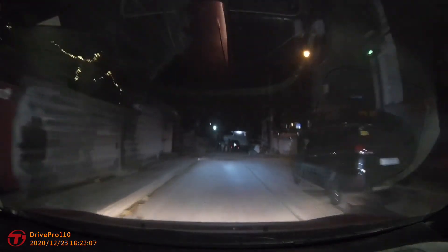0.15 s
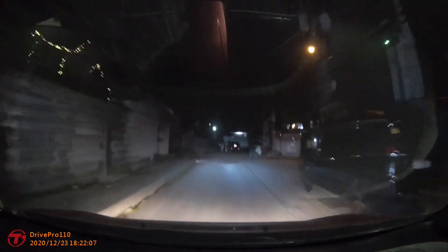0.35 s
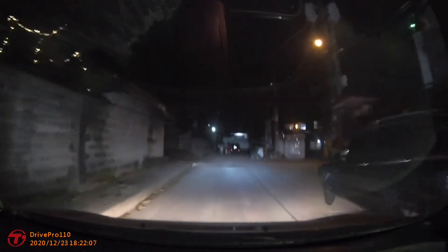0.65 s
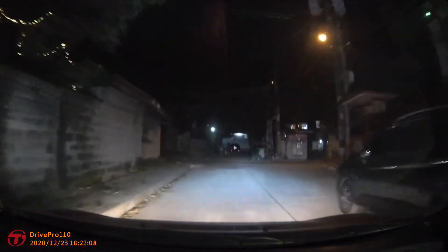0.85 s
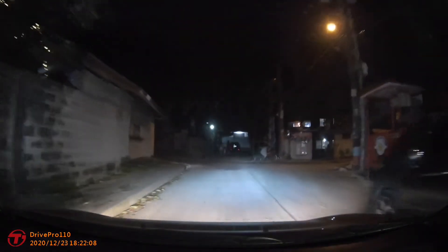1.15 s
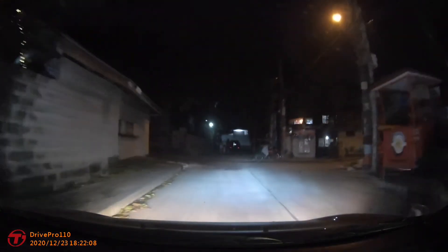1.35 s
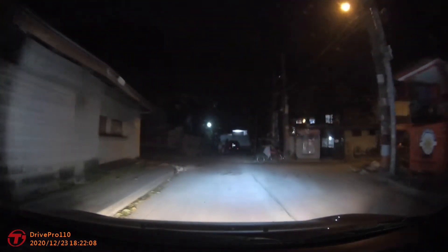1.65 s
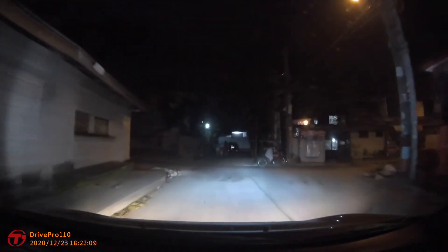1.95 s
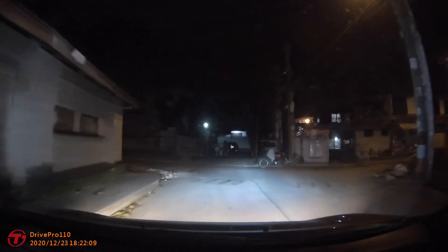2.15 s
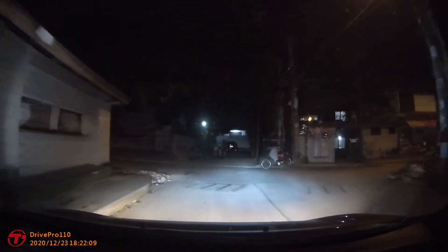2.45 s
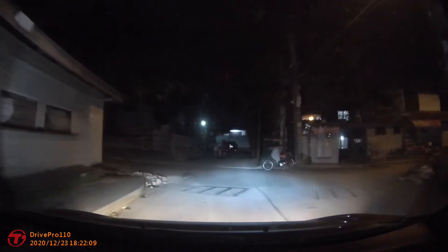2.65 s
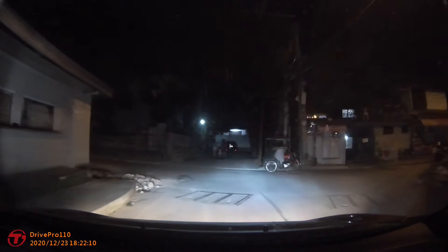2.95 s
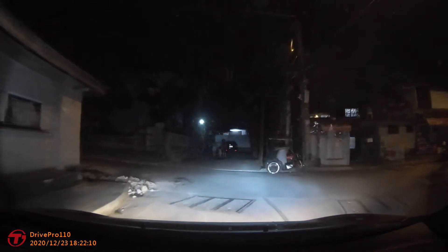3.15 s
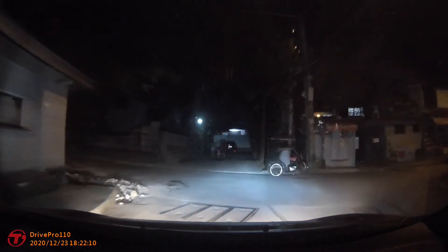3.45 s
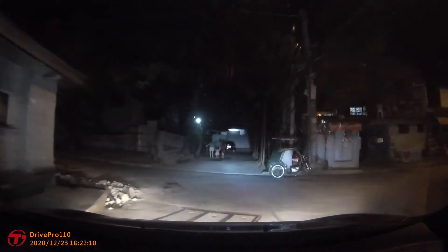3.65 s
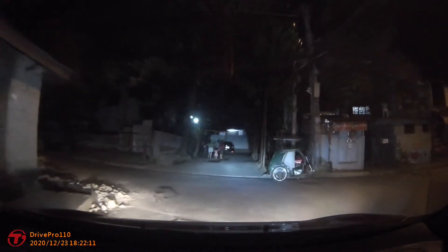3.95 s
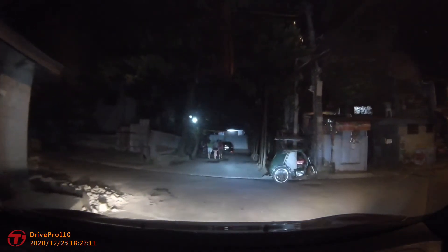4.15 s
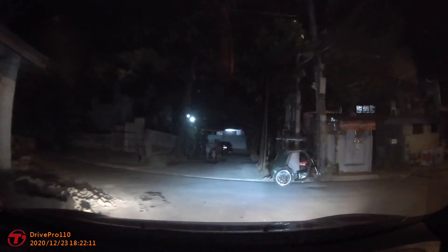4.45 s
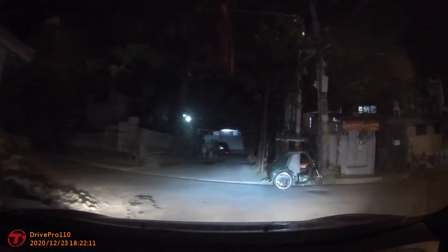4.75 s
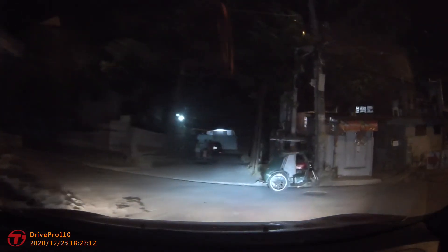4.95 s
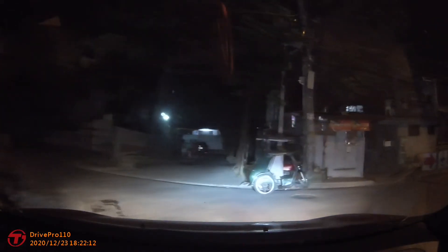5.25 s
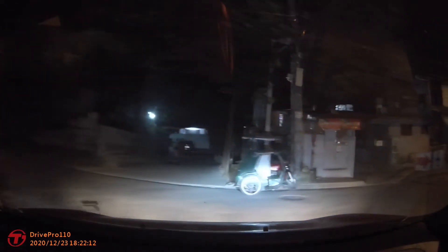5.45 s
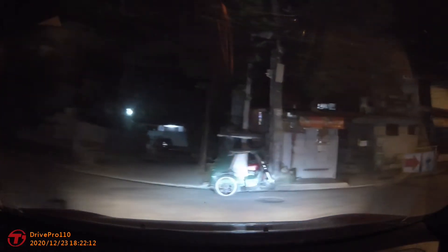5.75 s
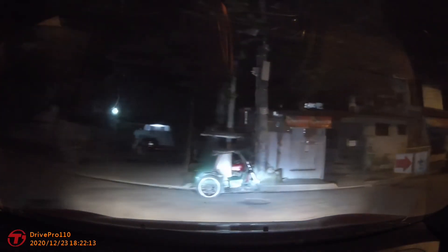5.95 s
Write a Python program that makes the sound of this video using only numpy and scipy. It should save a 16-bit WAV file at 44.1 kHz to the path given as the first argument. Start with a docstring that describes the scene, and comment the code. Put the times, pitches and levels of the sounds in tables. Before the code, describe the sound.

Inside a car rolling slowly over a rough lane, very low booms and shuddering rumble dominate the first three seconds. A loose fitting raps hard around two seconds, then the road calms. More knocks come around five seconds, followed by a low engine tone and a bright plastic crack at the end. A faint indicator ticks steadily throughout, close to the cabin microphone, under thin electronic hiss.

```python
"""Low booms of a car's body shell come first, over tyre roar, as it rolls slowly down a rough lane at night.
The microphone sits in the cabin behind the windscreen: close by, an indicator ticks, plastic snaps and a
loose fitting knocks; tyre noise comes up through the floor, and an engine tone rises at the end.
Booms and tones are wandering sines, road noise is shaped noise, and knocks are pushes ringing decaying modes.
The recorder's own electronics hiss and whine, and its input flattens the loudest booms."""
import sys
import numpy as np
from scipy import signal
from scipy.fft import rfft, irfft
from scipy.io import wavfile
from scipy.ndimage import uniform_filter1d

SR = 44100
rng = np.random.default_rng(int(sys.argv[2]) if len(sys.argv) > 2 else 0)


def to_wav(s):
    """Save 16-bit WAV."""
    ch = np.atleast_2d(s).T  # columns
    pcm = np.round(np.clip(ch, -1, 1) * 32767)  # PCM
    wavfile.write(sys.argv[1], SR, pcm.astype(np.int16))


N = 269010
T = np.arange(N) / SR  # seconds

# Recorder hiss spectrum: pitch_hz, relative_level_db (per Hz)
CIRCUIT_SPECTRUM = [(6000, -4), (7000, -6.5), (8500, -3), (11000, -3), (14000, -6), (14900, -16)]
# Recorder whistles: pitch_hz, level_db (rms, at mean hiss level)
WHINE_TONES = [(3628, -66.5), (5443, -83.5), (7203, -90), (7257, -88), (7364, -83), (9071, -81),
               (9125, -83.5), (9916, -72), (10939, -86), (12753, -89)]
# Mean hiss level in dB, and its change in dB per dB of trim buzz
HISS_DB, HISS_FOLLOWS = -66, 0.6
# Input stage: full-scale ceiling of the soft limit, and upper band edge in Hz
CLIP, TOP_HZ = 0.99, 14950

# Indicator ticks: start_s, peak_db
TICKS = [(0.169, -49), (0.5287, -45), (0.8884, -42), (1.2476, -44.5), (1.6077, -44), (1.9674, -46),
         (2.328, -42), (2.6878, -44), (3.047, -46), (3.4072, -44.5), (3.7673, -45.5), (4.128, -43.5),
         (4.4862, -45.5), (4.8469, -50), (5.2059, -44), (5.5662, -45), (5.9259, -42)]
# Tick pitch, burst length, tail level against the tick, tail decay by 60 dB
TICK_HZ, TICK_BURST_S, TICK_TAIL_DB, TICK_T60_S = 1973, 0.0046, -10, 0.068
# Engine order: mean pitch, mean rms level, onset, linear rise time
ENGINE_HZ, ENGINE_DB, ENGINE_ON_S, ENGINE_RISE_S = 178.5, -37.5, 5.84, 0.041

# Steady road noise: time_s, panel_drumming_db, low_tyre_roar_db, high_tyre_roar_db, trim_buzz_db
ROAD_LEVELS = [(0.0, -24, -32.5, -36, -51.5), (0.12, -33.5, -36.5, -45.5, -59.5),
               (0.59, -30, -40, -38.5, -58), (0.93, -30, -38.5, -40.5, -55.5), (1.34, -32.5, -39, -42, -57),
               (1.54, -33, -38.5, -40.5, -55), (2.11, -32.5, -37, -42.5, -58),
               (2.31, -34.5, -41.5, -42.5, -55.5), (2.48, -35, -45, -45, -58.5),
               (2.78, -33.5, -42, -42, -55), (3.36, -37.5, -44, -43, -57.5),
               (3.6, -38.5, -47, -48.5, -59.5), (4.08, -37, -43, -45, -57.5),
               (4.62, -42, -52, -50.5, -62.5), (4.86, -43.5, -47, -51, -64.5),
               (5.11, -42.5, -46.5, -47, -61), (5.4, -41.5, -48, -46.5, -60.5),
               (5.69, -41, -50, -43, -58.5), (6.1, -41, -52, -45, -55.5)]
# Jolts from the lane: peak_s, suspension_shudder_db, floor_db, door_panels_db, swell_and_fall_t60_s
LANE_JOLTS = [(0.064, -21, -20.5, -22, 0.42), (0.126, -9.5, -38.8, -50.0, 0.089),
              (0.335, -17, -23.5, -23.5, 0.21), (0.449, -23, -29, -24, 0.18), (0.538, -17, -47, -47, 0.21),
              (0.734, -23, -37, -30, 0.68), (0.843, -23, -50.0, -50.0, 0.2),
              (1.006, -13.5, -38, -50.0, 0.22), (1.09, -27, -23, -22, 0.34), (1.386, -19.5, -22, -31, 0.3),
              (1.551, -13.5, -48, -24, 0.12), (1.645, -21, -26.5, -30, 0.97),
              (1.767, -18, -50.0, -32, 0.19), (1.886, -24, -33, -33, 0.41), (2.018, -20, -26.5, -34, 0.75),
              (2.332, -22.5, -16.5, -25, 0.15), (2.366, -11.5, -22, -47, 0.091),
              (2.621, -27, -48, -35, 0.22), (2.843, -46, -29, -50.0, 0.092),
              (2.92, -21, -50.0, -34.5, 0.53), (3.34, -23.5, -27.5, -30, 0.7), (4.13, -16, -52, -52, 0.097),
              (4.964, -50.0, -27, -35, 0.095), (5.154, -25, -42, -54, 0.32), (5.303, -20, -41, -35, 0.15),
              (5.411, -34, -26.5, -35, 0.21)]
# Steady part of each body layer, dB above the panel drumming
SWAY_DB, SHUDDER_DB, DOORS_DB = 6.5, 6.5, -0.5
# Spectra of suspension, floor, door panels, low tyre roar through the seats, high tyre roar, loose trim,
# and a narrow drone in the tyre roar: pitch_hz, relative_level_db (per Hz)
SHUDDER_SPECTRUM = [(38, -51), (46, -20), (50, 0.5), (60, -1), (68, -4), (78, -8.5), (92, -20), (105, -52)]
FLOOR_SPECTRUM = [(72, -31), (85, -11.5), (95, 1.5), (104, -3), (122, -1.5), (138, -3), (155, -36)]
DOORS_SPECTRUM = [(125, -30), (143, -8.5), (160, 1), (174, -9.5), (205, -8), (245, -14.5), (275, -17.5),
                  (320, -36.5)]
SEATS_SPECTRUM = [(220, -39), (265, -9), (300, -1), (350, -1.5), (400, -2), (450, -9), (520, -28)]
TYRES_SPECTRUM = [(400, -21), (470, -5.5), (560, -4), (650, -4.5), (684, -3), (720, -8.5), (780, -5.5),
                  (960, -6), (1200, -9), (1360, -18), (1460, -13), (1600, -42), (1900, -37), (2300, -41)]
TRIM_SPECTRUM = [(940, -45), (1600, 2), (1790, -4.5), (1940, -4), (2290, -4), (2910, -2.5), (3250, -8),
                 (3440, -5.5), (3510, -5.5), (3750, -2), (3990, -9), (4490, -14.5), (5240, -7), (6300, -19),
                 (7000, -15), (9100, -46), (15400, -120)]
DRONE_SPECTRUM = [(630, -22), (660, -0.5), (684, -1), (705, 0), (735, -37)]
# Drone in the tyre roar: time_s, level_db
DRONE_LEVELS = [(0, -57), (1.0, -54), (2.0, -51), (3.0, -53), (4.0, -51), (4.7, -54.5), (5.3, -51),
                (5.75, -55), (5.9, -48.5), (6.1, -46)]

# Wheels hitting bumps: start_s, roar_db, trim_db, rise_s
BUMPS = [(.035, -29, -48, 0.015), (.08, -35.5, -53, 0.012), (.418, -29, -50, .016),
         (0.431, -29.5, -60, 0.006), (.488, -38, -54, .01), (1.516, -32, -61, 0.0024),
         (1.792, -36.5, -55, .002), (1.855, -37, -52, .006), (1.888, -36, -51, 0.012),
         (3.226, -50, -71, 0.0025), (3.915, -36.5, -49.5, 0.0062), (5.44, -49, -62, 0.022),
         (5.495, -47, -60, 0.024), (5.56, -43, -67, 0.018), (5.62, -48, -65, .01), (5.69, -36.5, -54, 0.01),
         (5.945, -36, -46, 0.024)]
BUMP_T60_S = 0.23
# Short low thumps of one panel: middle_s, pitch_hz, peak_db, length_s (at half height)
THUMPS = [(.06, 191.4, -24, .07), (.05, 483, -29.5, 0.017), (0.436, 594, -27, 0.01397),
          (0.453, 122, -21.5, 0.052), (0.751, 220.3, -28.5, 0.074), (1.074, 109.5, -22.5, 0.064),
          (1.091, 202.3, -25, .07), (1.223, 91, -24.5, .05), (1.361, 94.7, -23.5, .08),
          (1.61, 121.7, -24.5, 0.044), (1.902, 780, -32, .016), (1.18, 163, -25.5, 0.13),
          (1.278, 242.7, -32.5, .07), (1.55, 229, -28, 0.068), (1.78, 159.5, -24, 0.071),
          (1.91, 161.9, -25.5, 0.061), (2.339, 130, -23, 0.074), (3.04, 122.6, -33.5, .07),
          (3.42, 128, -32, 0.061), (4.96, 109, -33.5, 0.049), (5.0, 185.9, -33, 0.037),
          (5.08, 120, -34, 0.0515), (5.081, 253.6, -40.5, 0.052), (5.28, 149.6, -30.5, .07),
          (5.4, 119.7, -31, 0.061), (5.571, 185, -37, 0.067), (5.663, 266, -42, .05),
          (5.696, 68.5, -26.5, .04), (5.7, 224.8, -36.5, 0.082), (5.824, 239.5, -39, .08),
          (5.979, 265.4, -44.5, 0.064), (5.77, 159.8, -37.5, .05)]
THUMP_SAG = 0.039  # share by which the pitch falls during a thump

# Dry plastic snaps in the dashboard: start_s, crack_db, centre_hz, body_db (near 1 kHz)
SNAPS = [(0.4994, -46, 4480, -50), (0.77, -47, 3660, -48), (1.307, -40, 4040, -48),
         (1.5264, -40, 3740, -45), (2.0504, -45, 3800, -48), (2.794, -42, 2800, -44),
         (3.0847, -38.5, 4170, -50), (3.922, -47, 4200, -51), (5.686, -44, 3930, -42),
         (5.7289, -52, 3600, -50), (5.952, -45, 4540, -42), (5.9599, -40, 3580, -38),
         (5.968, -47, 4200, -39), (5.98, -47, 3000, -46), (5.995, -52, 2620, -40),
         (6.0091, -28, 3700, -21.5), (6.015, -29.5, 2880, -35), (6.021, -36, 3220, -34),
         (6.03, -51, 3040, -34)]
SNAP_T60_S = 0.026
PING_DB, PING_T60_S = -4, 0.018  # pitched ring of a snap, dB above its crack

# Knocks of the loose fitting: start_s, thud_db, clack_db, rattle_db, thud_pitch_hz,
# rebound_db (against the thud), clip_ring_db, rebound_after_s, pitch_rise_share
KNOCKS = [(1.946, -28, -41, -59, 570, -1, -55, 0.0083, 0.02),
          (1.975, -17, -19, -40.5, 588, -5.5, -25.5, 0.0098, 0.02),
          (1.994, -26, -34, -64, 564, -6, -53, .008, 0.02),
          (2.127, -12, -26, -36, 567, -7.5, -46, .0095, 0.45),
          (4.877, -36, -52, -68, 593, -7, -59, .009, 0.02),
          (4.923, -26, -34, -54, 526, -8, -55, 0.0076, 0.02),
          (4.95, -18.5, -24.5, -42, 600, -14, -32, 0.0097, .05),
          (4.97, -29, -41, -65, 590, -5, -55, .009, 0.02),
          (5.066, -16.5, -31, -40.5, 568, -4, -46, .0105, 0.23),
          (5.514, -29.5, -35, -59, 550, 0, -58, 0.014, 0.02),
          (5.541, -18, -28, -61, 597, -11, -36, 0.009, 0.046),
          (5.657, -19, -29, -43, 548, -2.5, -55, .0085, .4)]
# Modes of the fitting: multiple_of_thud_pitch, level_db, t60_s
FITTING_MODES = [(.9, -3, .012), (1.06, 0, .017), (1.72, -3, .03), (4.05, -8, .03)]
# Modes of a small clip on the fitting: pitch_hz, level_db, t60_s
CLIP_MODES = [(1480, -3, 0.07), (1680, -7, 0.038), (2320, 5, 0.029), (2780, 1.5, 0.037), (3840, -5, 0.029),
              (5270, -4, 0.033)]
# Modes of the panel behind the fitting: pitch_hz, level_db, t60_s
PANEL_MODES = [(560, -15, 0.079), (690, 8, 0.051), (952, 6, 0.062), (1088, 0, 0.076), (1180, -10, 0.086),
               (1454, -7, 0.082)]
PANEL_DB = -4  # above the clack
# Rattle spectrum: pitch_hz, relative_level_db (per Hz)
RATTLE_SPECTRUM = [(1200, -15), (1600, 2), (2300, -4), (2800, 0), (3300, -1), (3900, 0.5), (5200, -9.5),
                   (6800, -9.5), (8000, -38)]
# Clack noise band: low_hz, high_hz
CLACK_BAND = (684, 1160)
# Clack at the rebound, dB against the first clack; decay of the rattle
CLACK_BACK_DB, RATTLE_T60_S = -9.5, 0.044
# Panel wash level at a 0 dB thud, and its change in dB per dB of thud
WASH_DB, WASH_FOLLOWS = -32, 0.31
# Noise in the push of a thud; pitch of a rebound over that of the blow
THUD_ROUGH_DB, REBOUND_LIFT = -7, 1.046

# Body shell boom before its wander: time_s, pitch_hz
BOOM_PITCH = [(0.0, 30.35), (1.02, 30.89), (1.1, 35.3), (1.6, 36.05), (1.73, 32.88), (2.33, 32.89),
              (2.43, 30.65), (2.65, 32.59), (3.3, 34.3), (3.65, 30.05), (3.82, 31.73), (4.15, 31.23),
              (4.27, 28.04), (4.98, 26.15), (5.12, 31.7), (5.3, 31.6), (5.42, 25.96), (6.1, 21.8)]
# Heaves of the body: peak_s, boom_db, swell_t60_s, fall_t60_s
BODY_HEAVES = [(0.04, -15, 0.29, 0.3), (0.133, -3.5, 0.49, 0.076), (0.241, -9, 0.058, 0.3),
               (0.482, -1.5, 0.21, 0.26), (0.596, -2.5, 0.16, 0.36), (0.725, -14, 0.29, 0.43),
               (0.942, -16.5, 0.76, 0.14), (1.102, -11.5, 0.11, 0.42), (1.429, -17.5, 0.68, 0.22),
               (1.536, -5, 0.32, 0.19), (1.755, -11, 0.43, 2.0), (1.9, -3.5, 0.28, 0.53),
               (2.17, -19, 1, 0.5), (2.379, -15.5, 1.2, 0.35), (2.557, -20, 0.17, 0.13),
               (2.696, -19.5, 0.42, 1.9), (2.938, -4.5, 0.37, 0.21), (3.103, -9.5, 0.17, 0.22),
               (3.221, -11.5, 0.13, 0.67), (3.57, -30, 0.48, 0.43), (3.92, -17.5, 2.1, 0.42),
               (4.108, -17, 0.47, 0.36), (4.187, -15.5, 0.11, 0.44), (4.407, -19, 0.091, 0.29),
               (4.68, -23, 0.64, 0.96), (5.09, -18, 0.62, 0.66), (5.31, -18, 0.24, 0.48),
               (5.42, -19.5, 0.096, 0.43), (5.715, -19.5, 0.75, 0.14), (5.848, -19, 0.55, 1.6)]
# Loose sway of the body: pitch_hz, relative_level_db (per Hz)
SWAY_SPECTRUM = [(12, -20), (18, -14), (26, -4), (40, 0), (50, -16)]


def undb(db):
    """Turn decibels into an amplitude factor."""
    return 10 ** (np.asarray(db) / 20)


def columns(table):
    """Curve columns joined by straight lines in time."""
    time_s, *rest = np.transpose(table)
    return [np.interp(T, time_s, column) for column in rest]


def walk(rate):
    """Random levels held 1 / rate s and smoothed twice; spread near 1."""
    hold = int(SR / rate)
    steps = np.repeat(rng.standard_normal(N // hold + 1), hold)
    smooth = uniform_filter1d(uniform_filter1d(steps, hold), hold)
    return 1.23 * smooth[:N]


def coloured(spectrum, grit_db=0., grit_rate=100.):
    """Noise of rms 1 with the given spectrum; grit makes the excitation uneven."""
    hz, db = np.transpose(spectrum)
    f = np.maximum(np.fft.rfftfreq(N, 1 / SR), 1)
    gain = undb(np.interp(np.log(f), np.log(hz), db, -120, -120))
    excitation = rng.standard_normal(N) * undb(grit_db * walk(grit_rate))
    noise = irfft(rfft(excitation) * gain, N)
    return noise / np.std(noise)


def steadied(noise, span_s, share):
    """Take out a share of the slow swell of a narrow noise; rms 1."""
    swell = np.sqrt(uniform_filter1d(noise ** 2, int(span_s * SR)) + 1e-4)
    even = noise / swell ** np.clip(share, 0, 1)
    return even / np.std(even)


def fade(rise_s, t60):
    """A fast linear rise and an exponential fall, 0.2 s long."""
    t = T[:int(SR / 5)]
    return np.minimum(t / max(rise_s, 1e-4), 1) * 1000. ** (-t / max(t60, .004))


def band_pass(noise, band_hz):
    """Keep the part of a noise between two frequencies."""
    return signal.sosfilt(signal.butter(2, band_hz, "band", fs=SR, output="sos"), noise)


def burst(grit, band_hz, rise_s, t60):
    """Noise in a band, scaled to rms 1, that rises fast and dies away."""
    noise = band_pass(grit, band_hz)
    return noise / np.std(noise) * fade(rise_s, t60)[:len(grit)]


def ring(push, modes):
    """A push rings decaying modes (pitch_hz, level_db, t60_s); 80 ms long, peak 1."""
    t = np.arange(int(.08 * SR)) / SR
    body = sum(undb(db) * np.sin(2 * np.pi * hz * t) * 1000. ** (-t / t60) for hz, db, t60 in modes)
    rung = signal.fftconvolve(body, push)[:len(t)]
    return rung / np.abs(rung).max()


def surge(peak_s, db, swell_t60, fall_t60):
    """Power that swells to a peak and dies away."""
    distance = np.maximum((peak_s - T) / swell_t60, (T - peak_s) / fall_t60)
    return undb(2 * db) * np.exp(-2 * np.log(1000) * distance)


def shaken(steady_db, column):
    """Level of one body layer: power of the steady lane plus that of the jolts."""
    jolts = sum(surge(row[0], row[column], row[-1], row[-1]) for row in LANE_JOLTS)
    return np.sqrt(undb(2 * steady_db) + jolts)


def add(out, start_s, sound):
    """Mix a sound into out at its start time, cut at the end."""
    i = int(start_s * SR)
    out[i:i + len(sound)] += sound[:N - i]


def electronics():
    """Circuit hiss and thin whistles that rise and fall together with the trim buzz of the road."""
    buzz_db = columns(ROAD_LEVELS)[-1]
    lift_db = HISS_FOLLOWS * (buzz_db - buzz_db.mean())
    whine = sum(undb(db + 2.0 * walk(9)) * np.sin(2 * np.pi * (hz * T + rng.random()))
                for hz, db in WHINE_TONES)
    hiss = coloured(CIRCUIT_SPECTRUM, grit_db=1.2, grit_rate=30.)
    return undb(lift_db) * (undb(HISS_DB) * hiss + np.sqrt(2) * whine)


def indicator():
    """Short tone bursts from behind the dash; the cabin returns a ragged, decaying tail."""
    pulses = np.zeros(N)
    for start_s, peak_db in TICKS:
        pulses[int(start_s * SR)] = undb(peak_db)
    t = T[:int(TICK_BURST_S * SR)]
    tick = np.sin(2 * np.pi * TICK_HZ * t) * np.hanning(len(t)) ** 0.19
    direct = signal.fftconvolve(pulses, tick)[:N]
    # the tail is narrow noise, so it differs a little from tick to tick
    tail_shape = np.r_[np.zeros(len(t)), 1000. ** (-T[:4000] / TICK_T60_S)]
    decay = signal.fftconvolve(pulses, tail_shape)[:N]
    tail = band_pass(rng.standard_normal(N), [TICK_HZ - 45, TICK_HZ + 45])
    return direct + undb(TICK_TAIL_DB) * decay * steadied(tail, .006, 0.94)


def engine():
    """One engine order, a slightly unsteady sine, comes up as the driver pulls away."""
    rise = np.clip((T - ENGINE_ON_S) / ENGINE_RISE_S, 0, 1)
    phase = 2 * np.pi * np.cumsum(ENGINE_HZ * (1 + 0.0049 * walk(14))) / SR
    return np.sqrt(2) * rise * undb(ENGINE_DB + 0.89 * walk(18)) * np.sin(phase)


def road():
    """Road roughness comes through suspension, panels, tyres and loose trim as shaped noise."""
    panel_db, low_db, high_db, buzz_db = columns(ROAD_LEVELS)
    waver = walk(12)  # a shared random waver of roar and buzz
    shudder_noise = steadied(coloured(SHUDDER_SPECTRUM), 0.048, 0.36)
    shudder = shaken(panel_db + SHUDDER_DB, column=1) * shudder_noise
    floor_noise = steadied(coloured(FLOOR_SPECTRUM, grit_db=2., grit_rate=25.), 0.15, 0.2)
    floor = shaken(panel_db, column=2) * floor_noise
    doors_noise = steadied(coloured(DOORS_SPECTRUM, grit_db=2., grit_rate=30.), 0.061, 0.21)
    doors = shaken(panel_db + DOORS_DB, column=3) * doors_noise
    low = undb(low_db + 1.83 * waver) * coloured(SEATS_SPECTRUM, grit_db=1.5, grit_rate=40.)
    high = undb(high_db + 1.16 * waver) * coloured(TYRES_SPECTRUM, grit_db=1.5, grit_rate=60.)
    buzz = undb(buzz_db + 1.26 * waver) * coloured(TRIM_SPECTRUM, grit_db=1.0, grit_rate=140.)
    drone = undb(columns(DRONE_LEVELS)[0]) * steadied(coloured(DRONE_SPECTRUM), .04, 0.44)
    return drone + shudder + floor + doors + low + high + buzz


def bumps():
    """A bump drives the tyre roar and the trim harder for a moment."""
    roar, trim = np.zeros(N), np.zeros(N)
    for start_s, roar_db, trim_db, rise_s in BUMPS:
        add(roar, start_s, undb(roar_db) * fade(rise_s, BUMP_T60_S))
        add(trim, start_s, undb(trim_db) * fade(rise_s, BUMP_T60_S))
    tyre_noise = steadied(coloured(TYRES_SPECTRUM, grit_db=1.5, grit_rate=290.), 0.02, 0.73)
    trim_noise = coloured(TRIM_SPECTRUM, grit_db=2.0, grit_rate=240.)
    return roar * tyre_noise + trim * trim_noise


def thumps():
    """One panel rings for a moment: each sine swells and dies, sagging in pitch."""
    out, start_turns = np.zeros(N), rng.random(len(THUMPS))
    for (middle_s, hz, db, length_s), turn in zip(THUMPS, start_turns):
        t = T[:int(2 * length_s * SR)]
        sag = THUMP_SAG * (t - length_s) ** 2 / (4 * length_s)
        tone = np.sin(2 * np.pi * (hz * (t - sag) + turn))
        add(out, max(middle_s - length_s, 0), undb(db) * np.hanning(len(t)) * tone)
    return out


def snaps():
    """Short bright cracks: a noise burst, a ping at and under its centre, and a little body below."""
    out, chance = np.zeros(N), rng.standard_normal((len(SNAPS), 4000))
    for (start_s, crack_db, hz, body_db), grit in zip(SNAPS, chance):
        crack = burst(grit, (hz * 0.48, hz * 1.44), 0.0024, SNAP_T60_S)
        ping = ring(grit[-40:], [(hz, 0, PING_T60_S), (hz * .6, -2, PING_T60_S)])
        body = burst(grit, (900, 1250), 0.0026, 0.022)
        add(out, start_s - .001, undb(crack_db) * crack)
        add(out, start_s, undb(crack_db + PING_DB) * ping)
        add(out, start_s, undb(body_db) * body)
    return out


def thud(hz, glide, grit):
    """A few cycles of push, rising in pitch by the glide share and roughened, ring the fitting."""
    t = T[:340]
    tone = np.sin(2 * np.pi * hz * (t + glide * t * (t / t[-1] - 1) / 2))
    rough = undb(THUD_ROUGH_DB) * burst(grit, (380, 1100), .001, 0.88)[:340]
    modes = [(hz * multiple, db, t60) for multiple, db, t60 in FITTING_MODES]
    return ring((tone + rough) * np.hanning(340), modes)


def knocks():
    """Each blow is damped at once and rebounds twice, with clack, rattle and a ragged wash."""
    out, rattle = np.zeros(N), np.zeros(N)
    chance = rng.standard_normal((len(KNOCKS), 2, int(.15 * SR)))
    for knock, (grit, shake) in zip(KNOCKS, chance):
        start_s, thud_db, clack_db, rattle_db, hz, back_db, ring_db, back_s, glide = knock
        blow_s = start_s - .0015
        # the blow: clack, thud, panel and clip
        add(out, blow_s, undb(clack_db) * burst(grit, CLACK_BAND, 0.0023, 0.012))
        add(out, blow_s, undb(thud_db) * thud(hz, glide, shake[1000:2000]))
        panel = ring(shake[:400] * np.hanning(400), PANEL_MODES)
        add(out, start_s, undb(clack_db + PANEL_DB) * panel)
        add(out, blow_s, undb(ring_db) * ring(np.hanning(7), CLIP_MODES))
        # two rebounds, then the clack and clip of the first
        first_back = thud(hz * REBOUND_LIFT, 0, shake[2000:3000])
        add(out, blow_s + back_s, undb(thud_db + back_db) * first_back)
        second_back = thud(hz * REBOUND_LIFT, 0, shake[3000:4000])
        add(out, blow_s + 2.4 * back_s, undb(thud_db + 2 * back_db - 5.5) * second_back)
        clack_back = burst(grit[::-1], CLACK_BAND, 0.002, 0.028)
        add(out, blow_s + back_s, undb(clack_db + CLACK_BACK_DB) * clack_back)
        add(out, start_s + back_s, undb(ring_db - 20) * ring(grit[-24:], CLIP_MODES))
        # the panel behind keeps shaking
        wash = burst(shake, (430, 900), 0.017, 0.13)
        add(out, start_s, undb(WASH_DB + WASH_FOLLOWS * thud_db) * wash)
        add(rattle, blow_s, undb(rattle_db) * fade(0.00084, RATTLE_T60_S))
        add(rattle, blow_s + back_s, undb(rattle_db - 20) * fade(0.003, RATTLE_T60_S))
    rattle_noise = steadied(coloured(RATTLE_SPECTRUM, grit_db=3., grit_rate=290.), .006, .6)
    return out + rattle * rattle_noise


def boom():
    """The shell's lowest mode, its pitch drifting and wavering, over a looser sway of the body."""
    hz, = columns(BOOM_PITCH)
    heave = np.sqrt(sum(surge(*row) for row in BODY_HEAVES))
    calm = undb(columns(ROAD_LEVELS)[0] + SWAY_DB)
    wandering_hz = hz * (1 + 0.0641 * walk(12))
    phase = 2 * np.pi * np.cumsum(wandering_hz) / SR + 2 * np.pi * rng.random()
    sway = (undb(-10.5) * heave + calm) * coloured(SWAY_SPECTRUM)
    return np.sqrt(2) * heave * np.sin(phase) + sway


def scene():
    """Everything that reaches the microphone, with the electronics' own noise, in one channel."""
    background = electronics() + indicator() + engine() + road()
    near = bumps() + thumps() + snaps() + knocks()
    return (background + near + boom())[None]


def record(dry):
    """The input stage softly flattens the biggest booms; a steep low-pass cuts the top."""
    flat = dry / (1 + np.abs(dry / CLIP) ** 8) ** (1 / 8)
    low_pass = signal.ellip(10, .2, 80, TOP_HZ, fs=SR, output="sos")
    return signal.sosfilt(low_pass, flat)


dry = scene()
out = record(dry)
to_wav(out)
```